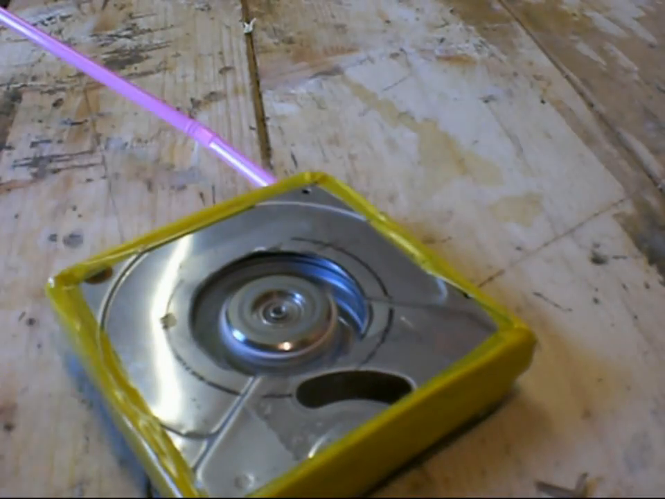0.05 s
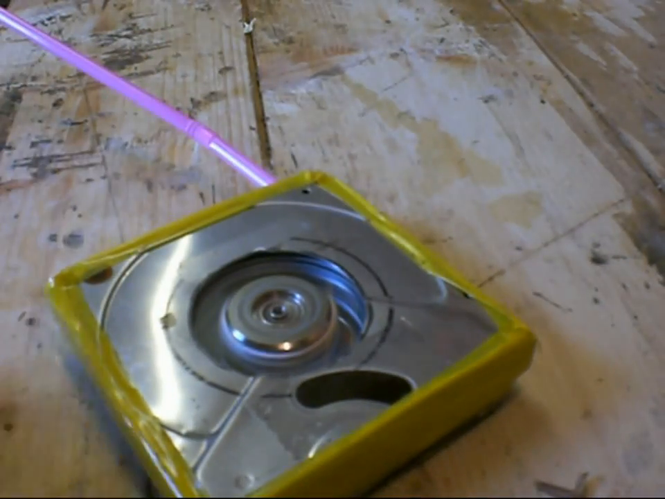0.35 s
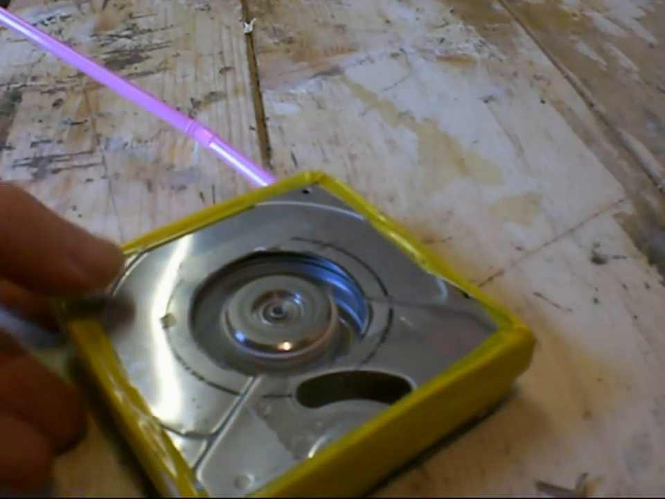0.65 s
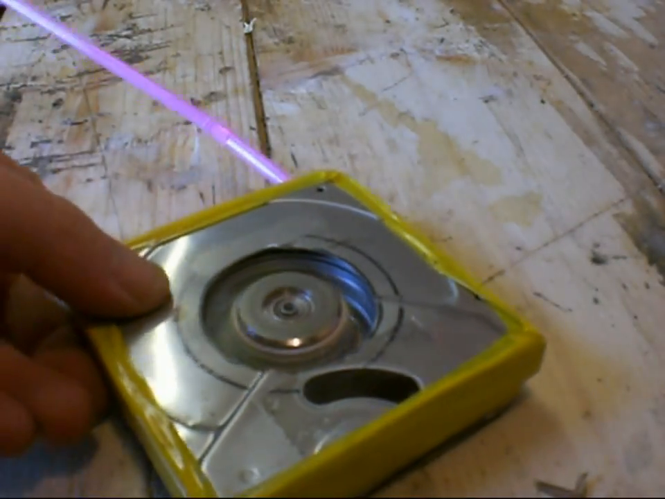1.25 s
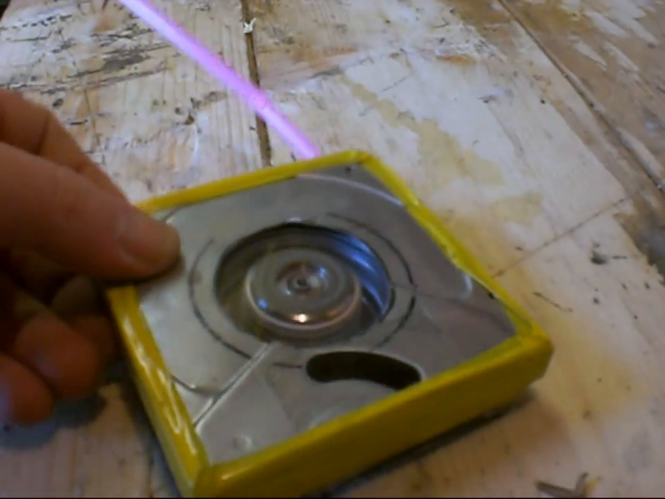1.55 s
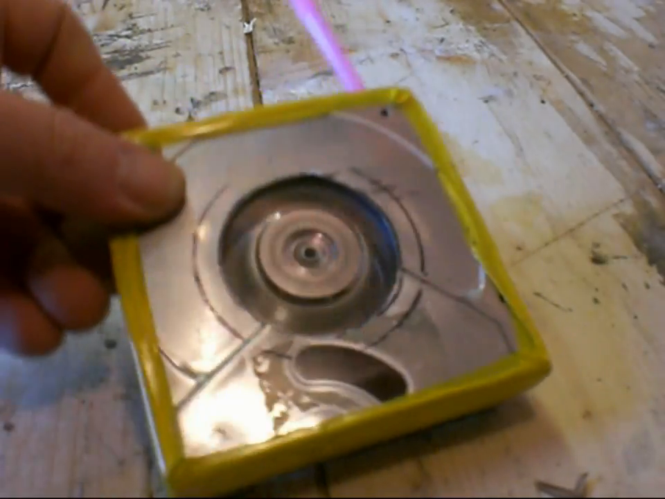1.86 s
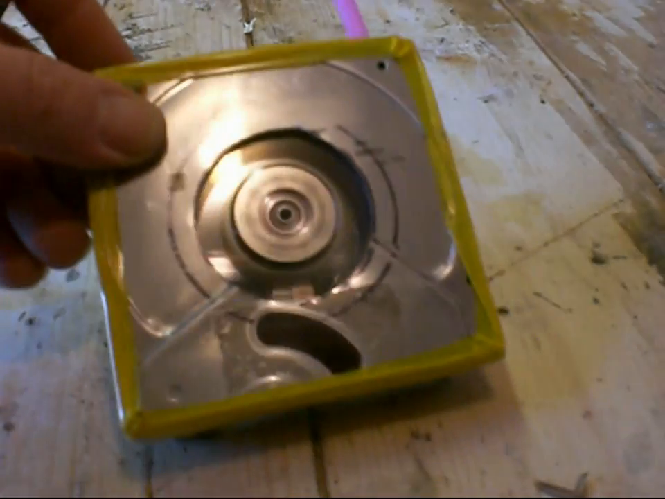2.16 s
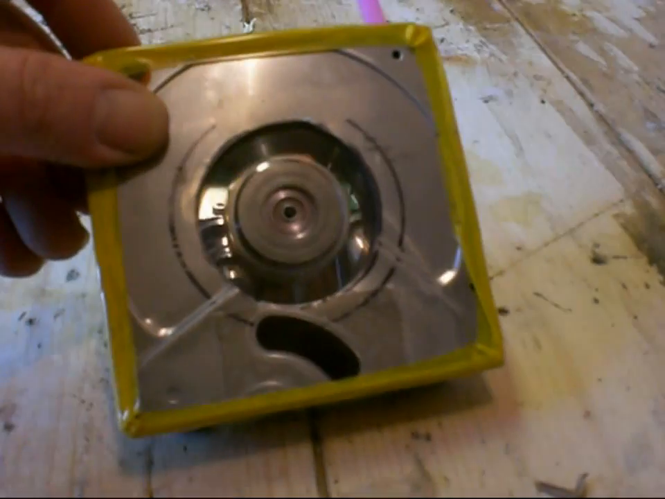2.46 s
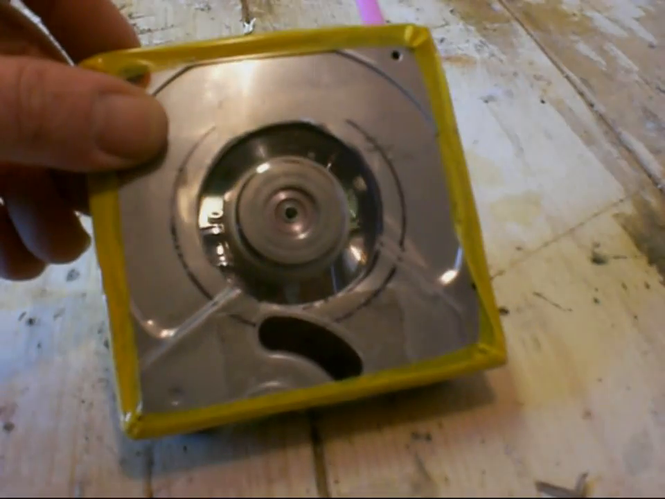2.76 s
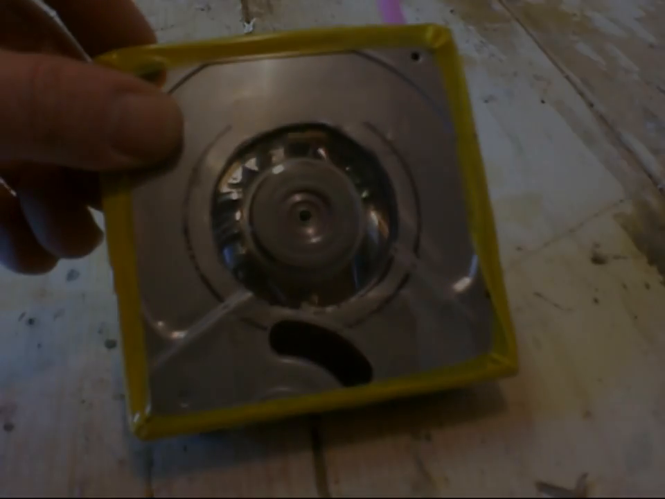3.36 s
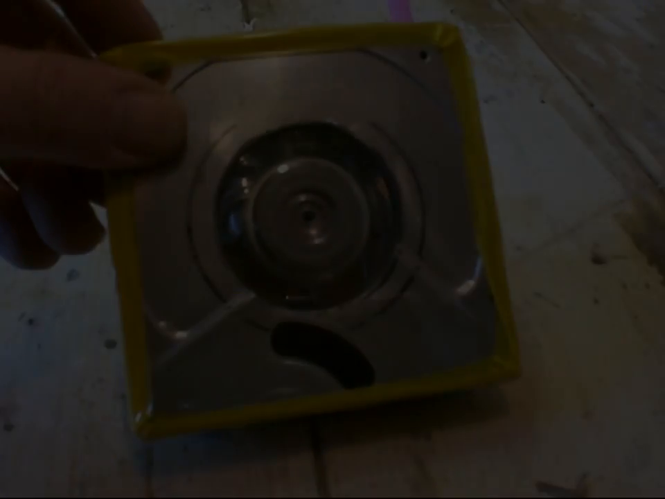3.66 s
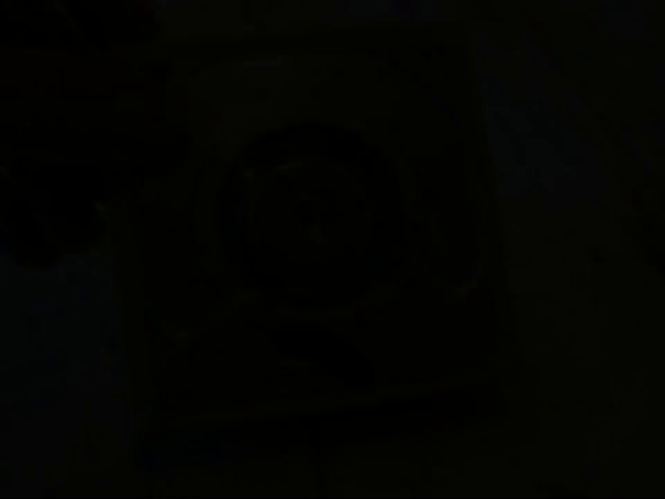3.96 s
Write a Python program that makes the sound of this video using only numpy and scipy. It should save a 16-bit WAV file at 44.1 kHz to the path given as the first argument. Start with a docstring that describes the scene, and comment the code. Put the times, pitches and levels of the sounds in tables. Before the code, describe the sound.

Metallic buzzing whir of a small spinning turbine, with compressed air hissing along.

```python
"""A metallic buzz over hissing air: a small disc turbine in a taped metal case, driven by compressed air
and slowly losing speed. Balls roll over flaws in two worn bearings and ring the case; the bearings beat
against each other. Fingers take hold with a thin sizzle and soft bumps and tilt the case off the bench,
which changes how it rings. The escaping air whistles faintly at times. The sound fades out at the end."""
import sys
import numpy as np
from scipy import signal
from scipy.fft import rfft, irfft, next_fast_len
from scipy.io import wavfile

SR = 44100
rng = np.random.default_rng(int(sys.argv[2]) if len(sys.argv) > 2 else 0)


def digitize_waveform(pressure):
    """Quantize a signal to 16-bit integers and store it at the path in sys.argv[1].

    Rows of a 2-D input are taken as channels; values are limited to [-1, 1].
    """
    field = np.atleast_2d(pressure).T
    bounded = np.clip(field, -1, 1)
    quanta = np.round(bounded * 32767).astype(np.int16)
    wavfile.write(sys.argv[1], SR, quanta)


N = 176400
T = np.arange(N) / SR


def from_db(db):
    """Decibels to gain."""
    return 10 ** (np.asarray(db) / 20)


def rms_one(x):
    """Scale to an rms of 1."""
    return x / np.sqrt(np.mean(x ** 2) + 1e-20)


def ramp(start_s, end_s):
    """Linear rise from 0 to 1."""
    return np.clip((T - start_s) / (end_s - start_s), 0, 1)


def curve(points):
    """Straight lines through (time_s, value) points."""
    return np.interp(T, *np.transpose(points))


def drift(rate_hz):
    """Slow random wander, rms 1."""
    pole = np.exp(-200 * np.pi * rate_hz / SR)  # one step per 100 samples
    slow = signal.lfilter([1], [1, -2 * pole, pole * pole], rng.standard_normal(N // 100 + 1002))[1000:]
    return np.interp(np.arange(N) / 100, np.arange(len(slow)), rms_one(slow))


def grains(per_s):
    """Clicks of random size at random moments."""
    return (rng.random(N) < per_s / SR) * rng.standard_normal(N)


def coloured(x, spectrum):
    """Minimum-phase filter through (freq_hz, gain_db) points; output rms 1."""
    size = next_fast_len(N + SR // 10)
    hz, db = np.transpose(spectrum)
    bin_hz = np.arange(size // 2 + 1) * SR / size
    gain = from_db(np.interp(np.log(bin_hz + 1), np.log(hz), db))
    cepstrum = irfft(np.log(gain), size)
    response = np.exp(rfft(2 * cepstrum[:size // 2], size))
    return rms_one(irfft(rfft(x, size) * response, size)[:N])


def tilt_coloured(x, table, tilt):
    """Crossfade from the lying spectrum (tilt 0) to the tilted one (tilt 1)."""
    table = np.array(table)
    return (1 - tilt) * coloured(x, table[:, [0, 1]]) + tilt * coloured(x, table[:, [0, 2]])


def resonance(x, hz, width_hz):
    """Band-pass with unity gain at its centre, which may move."""
    carrier = np.exp(2j * np.pi * np.cumsum(hz * np.ones(N)) / SR)
    pole = np.exp(-np.pi * width_hz / SR)
    return 2 * np.real(carrier * signal.lfilter([1 - pole], [1, -pole], x / carrier))


def knock_strengths(count, spread_db=2.5):
    """Each knock pushes or pulls, a little harder or softer than the others."""
    return rng.choice([-1, 1], count) * from_db(spread_db * rng.standard_normal(count))


# rush spectrum: freq_hz, gain_db
RUSH_SPECTRUM = [(20, -14), (60, -8.5), (115, -1), (150, 3), (190, 5), (260, -4), (450, 1.5), (600, 5),
                 (950, 3), (2000, -19.5)]


def air_rush(tilt):
    """Low rush of the air and the room, softer when tilted."""
    return from_db(-51 - 2.5 * tilt) * coloured(rng.standard_normal(N), RUSH_SPECTRUM)


# hiss spectrum: freq_hz, lying_db, tilted_db
HISS_SPECTRUM = [(1000, -3, -2), (7450, -1, -10.5), (9530, 4, -1), (9820, 10, 10), (10290, 0.5, 2),
                 (11600, -2, -1), (12400, -2, 5), (13000, 0, 0), (13800, 2, 6), (16000, -2, -0.5)]


def air_hiss(ticks, tilt, tick_share=0.24):
    """Escaping air, with the bright edge of the ticks in it."""
    source = np.sqrt(1 - tick_share) * rng.standard_normal(N) + np.sqrt(tick_share) * ticks
    return from_db(-40 - 1.6 * tilt) * tilt_coloured(source, HISS_SPECTRUM, tilt)


# air whistles: start_s, end_s, pitch_hz, level_db
WHISTLES = [(1.3, 1.92, 9100, -54), (1.62, 2.05, 9780, -51), (3.239, 3.8, 9900, -50)]


def air_whistles(width_hz=190):
    """Narrow bands of hiss that swell and die away."""
    out = np.zeros(N)
    for start_s, end_s, pitch_hz, level_db in WHISTLES:
        swell = np.sqrt(np.abs(np.sin(np.pi * ramp(start_s, end_s))))
        band = resonance(rng.standard_normal(N), pitch_hz, width_hz)
        out += from_db(level_db) * swell * rms_one(resonance(band, pitch_hz, width_hz))
    return out


# sizzle spectrum: freq_hz, gain_db
SIZZLE_SPECTRUM = [(7000, -13), (11000, -6.5), (12500, -11), (13600, 1), (14500, -7), (16000, -12)]


def finger_sizzle(start_s=0.53, end_s=1.176, edge_s=0.08, rise_db_per_s=4):
    """A faint high crackle that grows while the fingers take hold."""
    gate = ramp(start_s, start_s + edge_s) * (1 - ramp(end_s - edge_s, end_s))
    crackle = coloured(grains(per_s=2200), SIZZLE_SPECTRUM)
    return from_db(-38 + rise_db_per_s * (T - end_s)) * gate * crackle


# handling bumps: start_s, pitch_hz, peak_db
BUMPS = [(.325, 112, -45.5), (.38, 405, -44), (1.725, 736, -42), (1.725, 810, -46)]


def handling_bumps(t60_s=0.13):
    """Dull, short rings of the case and the bench."""
    out = np.zeros(N)
    for start_s, pitch_hz, peak_db in BUMPS:
        age_s = np.maximum(T - start_s, 0)
        out += from_db(peak_db - 60 * age_s / t60_s) * np.sin(2 * np.pi * pitch_hz * age_s)
    return out


# treble gain: time_s, gain_db
TREBLE_GAIN = [(0, -0.14), (.9, 0.26), (1.65, 2.6), (2.2, 0.52), (2.7, -0.63), (4, 1)]


def handling_treble(x, corner_hz=5800):
    """The treble swells and dips as the case is handled."""
    treble = signal.sosfiltfilt(signal.butter(6, corner_hz, "high", fs=SR, output="sos"), x)
    return x + (from_db(curve(TREBLE_GAIN)) - 1) * treble


# race flaws: strikes_per_turn, strikes_per_pattern
FLAWS = [(8, 8), (7.99, 8), (14.25, 57), (7.123, 8), (4.96, 5), (9.92, 10)]


def flaw_ticks(turns, roughness=0.23):
    """A flaw ticks whenever a ball meets it, in a repeating pattern of strengths plus some chance."""
    out = np.zeros(N + 1)
    for per_turn, period in FLAWS:
        strike = np.arange(int(turns[-1] * per_turn) - 1)
        slot = strike % period
        strike_turns = (strike + rng.random() + rng.normal(0, 0.019, period)[slot]) / per_turn
        at = np.interp(strike_turns, turns, np.arange(N))
        strength = knock_strengths(period)[slot] + roughness * rng.standard_normal(len(strike))
        np.add.at(out, at.astype(int), strength * (1 - at % 1))  # split between two samples
        np.add.at(out, at.astype(int) + 1, strength * (at % 1))
    return rms_one(out[:N])


# case resonances: freq_hz, lying_db, tilted_db
CASE_SPECTRUM = [(1015, -30.5, -29), (1120, -21, -18), (1266, -28.5, -27), (1740, -10.5, -15),
                 (2010, -23, -15.5), (2180, -17, -15.5), (2330, -21, -16), (2440, -12, -14.5),
                 (2900, -22, -21.5), (3090, -9, -5.5), (3400, -12, -13.5), (3830, -11.5, -7),
                 (4250, -10, -7), (4730, -8, -4.5), (5550, -9.5, -13), (5460, -15.5, -20.5),
                 (6950, -15, -18.5), (7440, -32.5, -32)]


def case_ring(ticks, tilt, band_hz=(816, 8700)):
    """Ticks and a random rattle ring the case, whose resonances shift as it leaves the bench."""
    knocks = from_db(-28) * ticks + from_db(-29.5) * rms_one(grains(per_s=2500))
    band = signal.sosfilt(signal.butter(4, band_hz, "band", fs=SR, output="sos"), knocks)
    return np.std(knocks) * tilt_coloured(band, CASE_SPECTRUM, tilt)


# lid mode, raised by finger pressure: time_s, freq_hz
LID_MODE = [(.6, 4110), (.8, 4323), (2.5, 4210), (3.1, 4330)]


def bench_and_lid(x):
    """A low bench hum and the lid's high ring lift tones gliding through them."""
    bench_hum = from_db(3) * resonance(x, hz=612, width_hz=20)
    lid_ring = from_db(2.2) * resonance(x, curve(LID_MODE), width_hz=132)
    return x + bench_hum + lid_ring


# ball-pass harmonics of both bearings: ball_pass_multiple, lying_db, tilted_db, beat_dip_s
BALL_PASS = [(4, -42.5, -50, 2.03), (5, -37, -42, 1.97), (6, -43, -45, 2.04), (7, -37.5, -38.5, 2.09),
             (10, -36, -62, 2.04), (11, -40.5, -44, 2.04), (12, -35, -41.5, 1.8), (13, -40.5, -32.5, 2.3),
             (14, -37, -41.5, 2.04), (15, -37, -44.5, 2.04), (16, -42, -35.5, 2.04)]
# buzz tones at whole multiples of the cage rate: cage_multiple, lying_db, tilted_db
CAGE_HARMONICS = [(16,-58,-60),(47,-43,-48),(57,-46,-42),(71,-48,-44),(72,-42.5,-41),(79,-36,-47),(81,-30.5,-46),(87,-38.5,-48),(97,-34,-39.5),(102,-41,-42),(103,-34.5,-34.5),(105,-35,-32),(111,-38,-38),(113,-32.5,-36),(114,-47,-40),(115,-39,-44),(118,-39,-40),(119,-35,-36.5),(121,-33,-31.5),(126,-37.5,-37.5),(127,-35.5,-38.5),(129,-35,-29),(135,-40,-41),(137,-40,-40),(152,-42.5,-45.5)]
# bearing tones between whole multiples of the cage rate: cage_multiple, lying_db, tilted_db
INHARMONIC_TONES = [(27.5,-56,-58.5),(28.5,-50,-54),(35.62,-46,-56),(36.58,-51,-56),(41.8,-43,-47),(42.74,-42,-42),(42.87,-39,-47),(49.86,-49,-47),(57.17,-50,-46),(63.92,-38,-39.5),(64.11,-38,-40.5),(70.23,-46,-44),(71.23,-47,-44),(77.36,-37.5,-50),(78.36,-46,-45),(82.59,-50,-43.5),(84.48,-44,-39),(86.48,-40,-55),(99.73,-39,-38.5),(105.86,-37,-44.5),(106.85,-41,-40)]


def bearing_tones(turns, tilt, balls=8, twin_speed_ratio=0.99877, scatter_rad=0.68, flicker_db=1.0):
    """Tones of the balls' uneven knocks; the slightly slower twin bearing makes the harmonics beat."""
    ball_turns = np.arange(balls) / balls + 0.0011 * rng.standard_normal(balls)
    strengths = knock_strengths(balls)

    def tone(multiple, lying_db, tilted_db, twin_gain=0, dip_s=0):
        phase = np.angle(strengths @ np.exp(-2j * np.pi * np.round(multiple) * ball_turns))
        phase += scatter_rad * rng.standard_normal()
        angle = 2 * np.pi * multiple * (turns - np.interp(dip_s, T, turns))
        twin = twin_gain * np.cos(angle * twin_speed_ratio + phase)
        pair = (np.cos(angle + phase) - twin) / np.sqrt(1 + twin_gain ** 2)
        level_db = lying_db + (tilted_db - lying_db) * tilt + flicker_db * drift(rate_hz=3.4)
        return np.sqrt(2) * pair * from_db(level_db)

    passes = sum(tone(balls * multiple, lying_db, tilted_db, twin_gain=from_db(-2), dip_s=dip_s)
                 for multiple, lying_db, tilted_db, dip_s in BALL_PASS)
    harmonics = sum(tone(*row, twin_gain=rng.choice([-1, 1]) * from_db(-15.5)) for row in CAGE_HARMONICS)
    inharmonic = sum(tone(*row) for row in INHARMONIC_TONES)
    return from_db(0.7) * (passes + harmonics + inharmonic)


# ball cage speed: time_s, turns_per_s
CAGE_SPEED = [(0, 39.648), (0.5, 39.23), (1.5, 38.311), (2.2, 37.725), (3.0, 37.082), (4.0, 36.28)]
# buzz gain under the hand's load: time_s, gain_db
BUZZ_GAIN = [(0, -1), (.6, 0), (.8, -1), (1.05, -0.5), (1.35, -0.86), (1.9, 0), (2.5, 0), (3.0, -1),
             (4, 0.5)]


def scene():
    """One cage speed drives the tones, ticks and air flutter; the tilt recolours buzz and hiss."""
    turns = np.cumsum(curve(CAGE_SPEED)) / SR + 0.00045 * drift(rate_hz=27)
    tilt = ramp(start_s=0.89, end_s=2.57)
    ticks = flaw_ticks(turns)
    buzz = from_db(curve(BUZZ_GAIN)) * bench_and_lid(case_ring(ticks, tilt) + bearing_tones(turns, tilt))
    air = air_hiss(ticks, tilt) + air_rush(tilt)
    flutter_db = np.sin(2 * np.pi * turns) + 0.73 * drift(rate_hz=30)
    turbine = handling_treble(buzz + air * from_db(flutter_db))
    return (turbine + air_whistles() + finger_sizzle() + handling_bumps())[None]


def record(dry):
    """Linear fade-out, then a steep low-pass at 15900 Hz."""
    faded = dry * (1 - ramp(start_s=2.913, end_s=4.064))
    return signal.sosfilt(signal.ellip(12, 0.1, 90, 15900, fs=SR, output="sos"), faded)


dry = scene()
out = record(dry)
digitize_waveform(out)
```